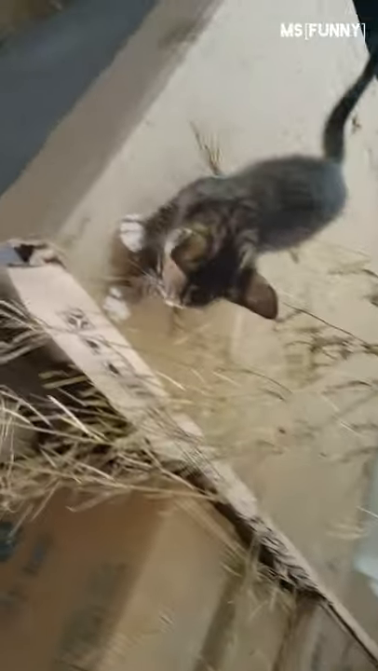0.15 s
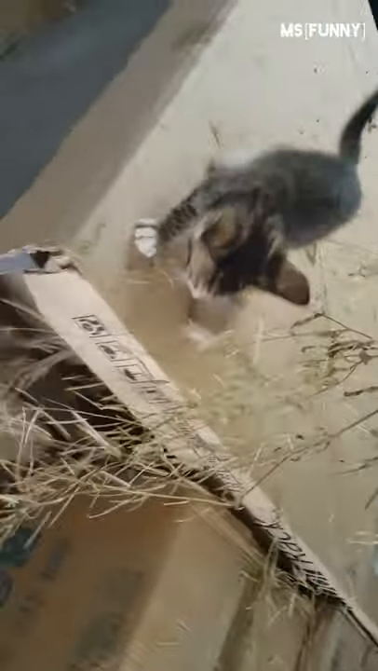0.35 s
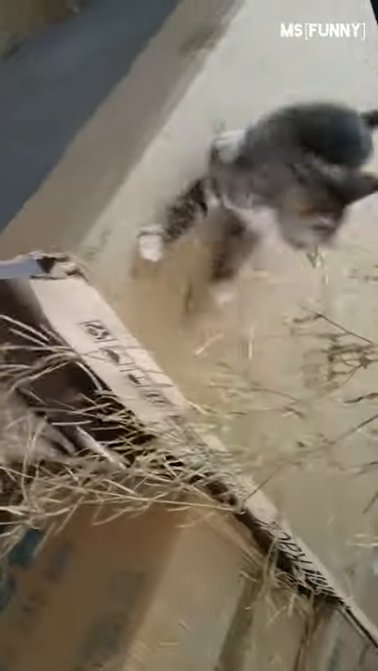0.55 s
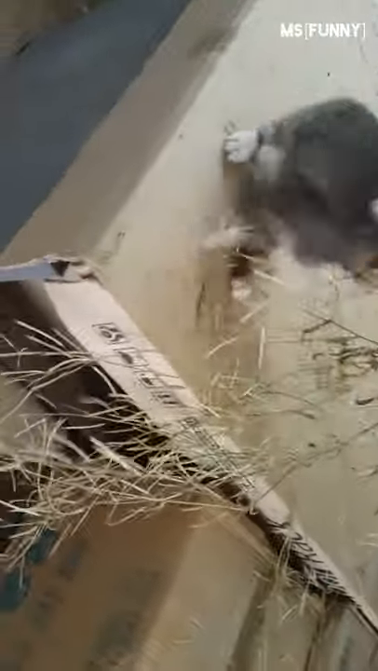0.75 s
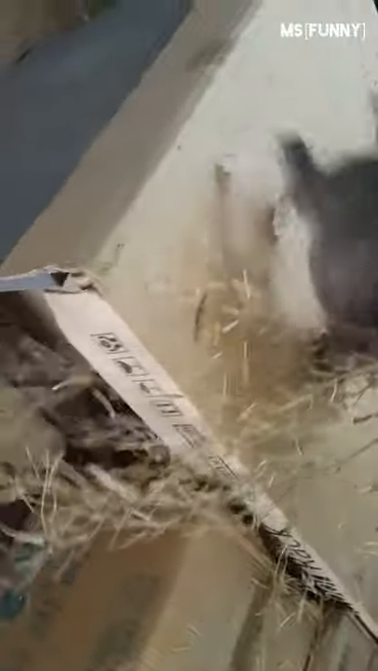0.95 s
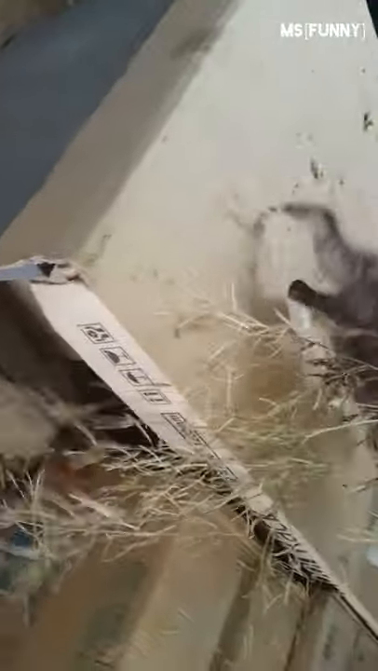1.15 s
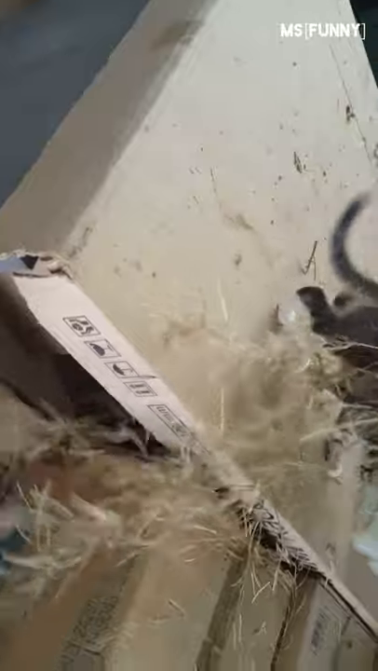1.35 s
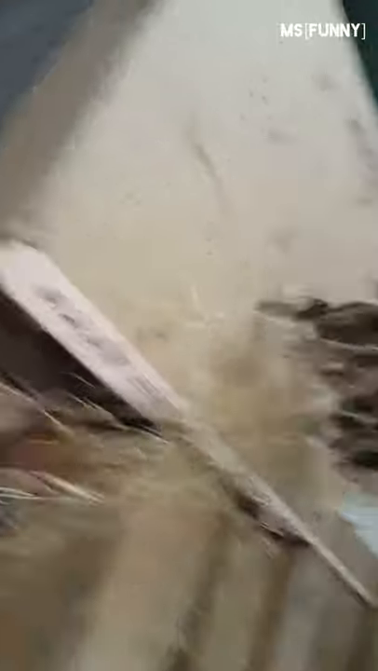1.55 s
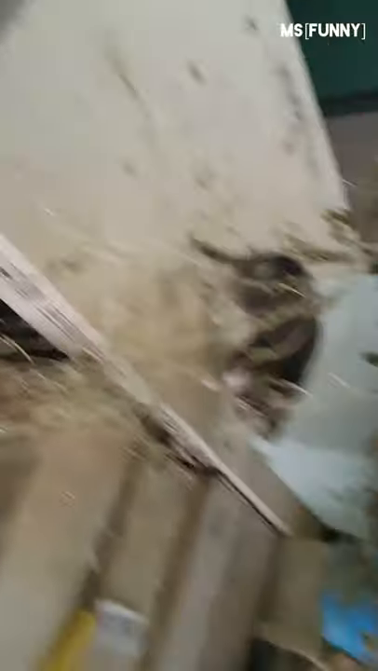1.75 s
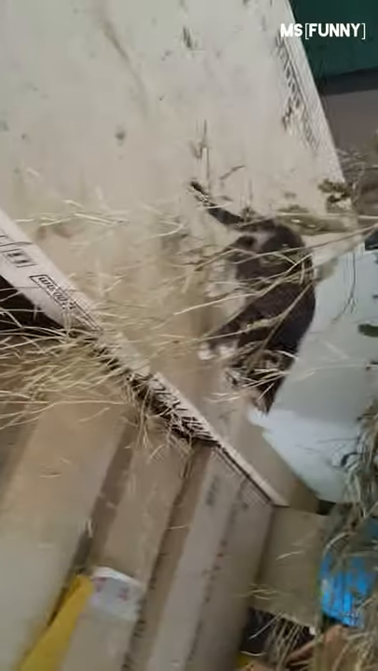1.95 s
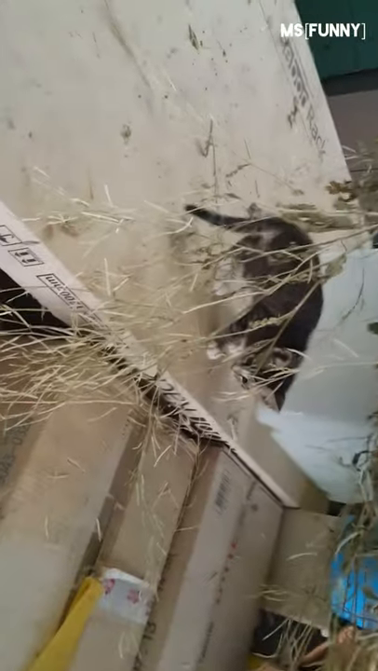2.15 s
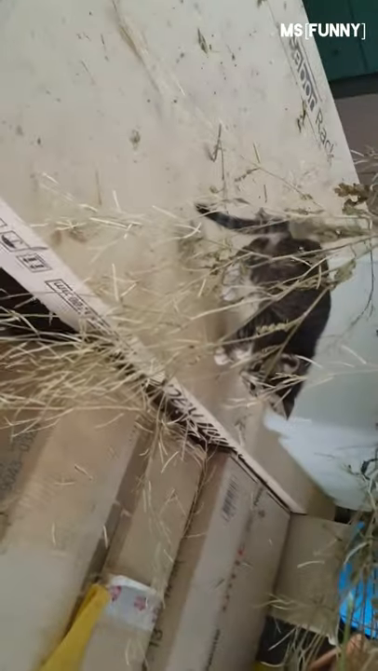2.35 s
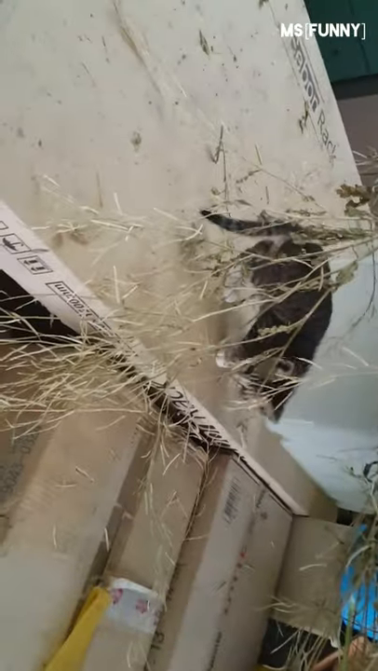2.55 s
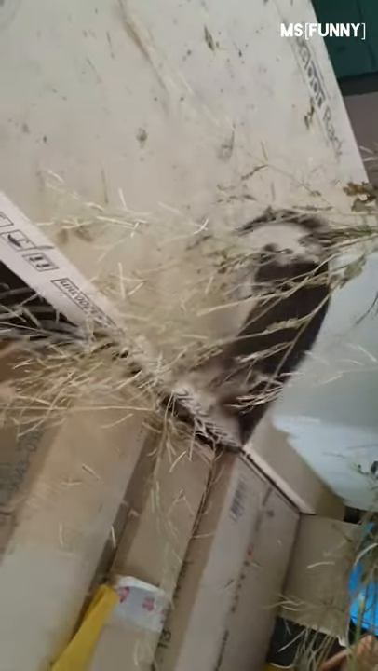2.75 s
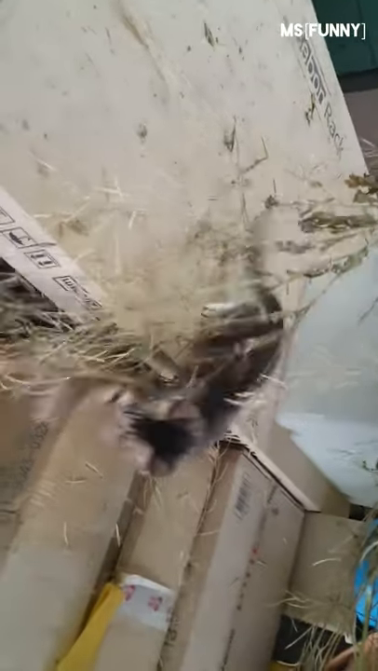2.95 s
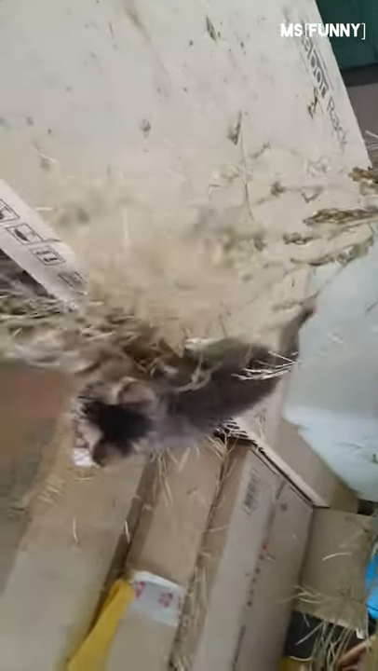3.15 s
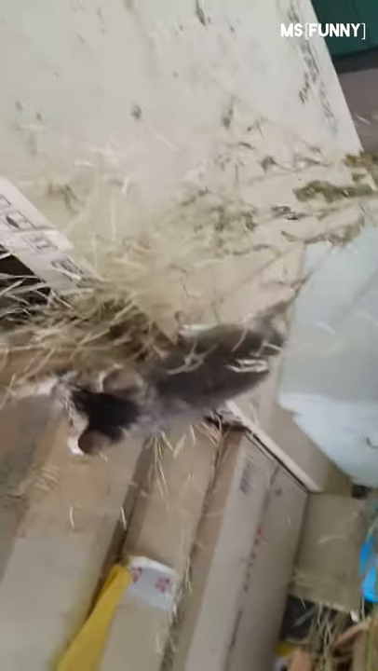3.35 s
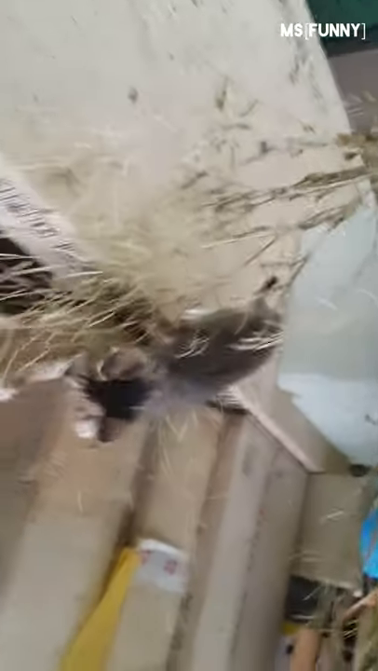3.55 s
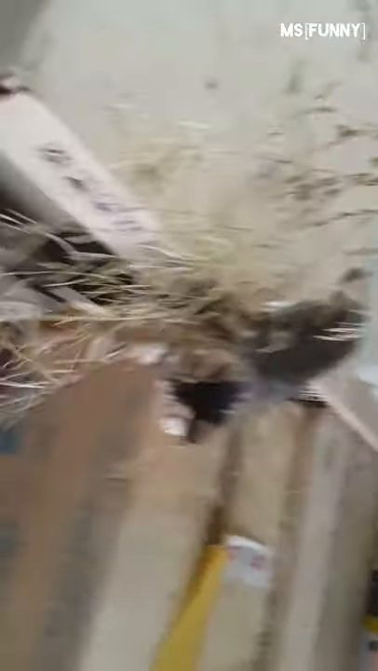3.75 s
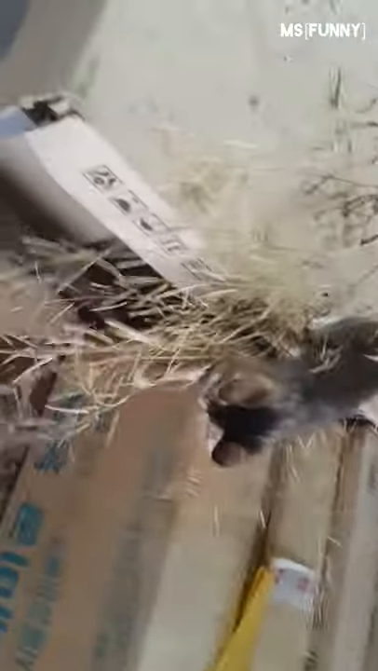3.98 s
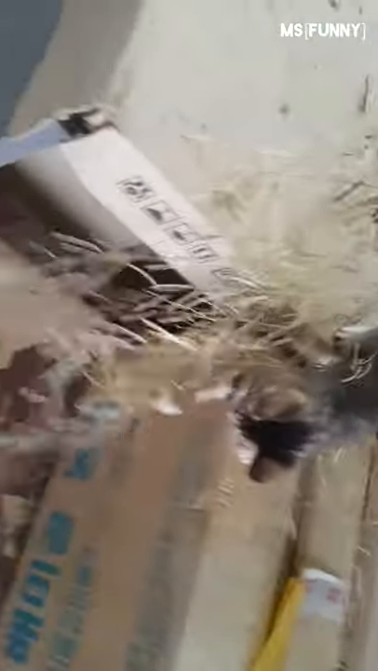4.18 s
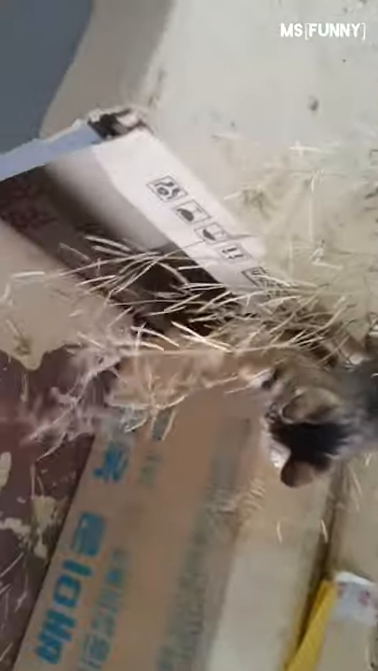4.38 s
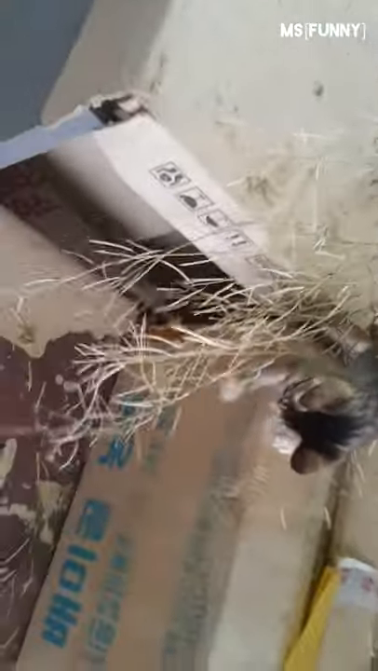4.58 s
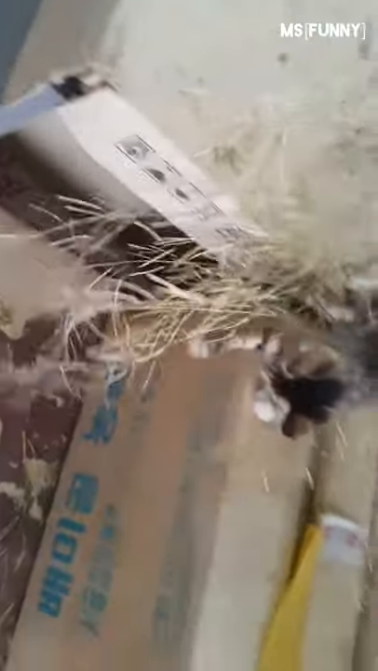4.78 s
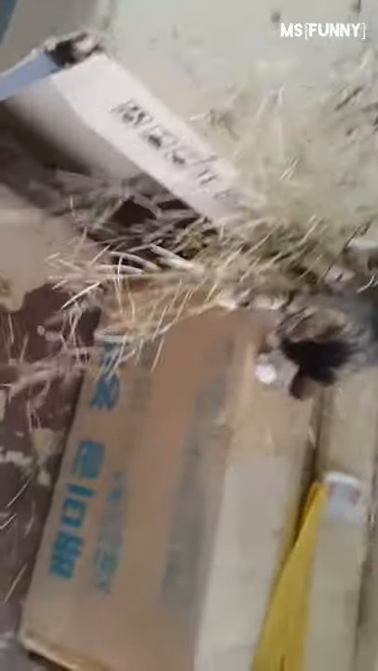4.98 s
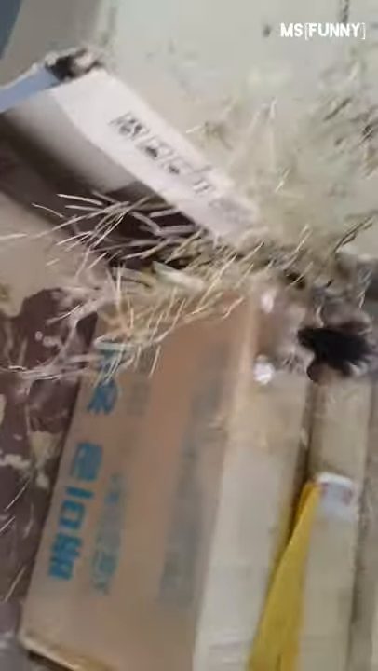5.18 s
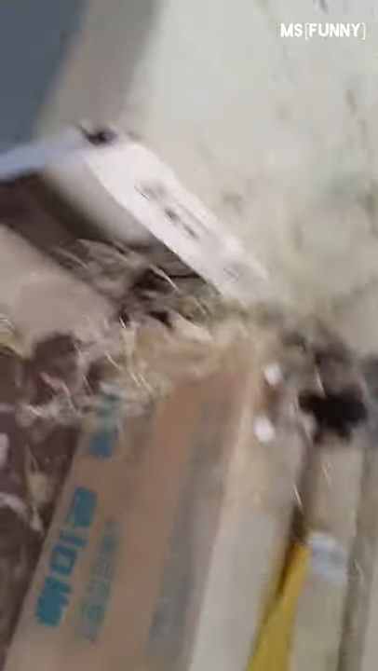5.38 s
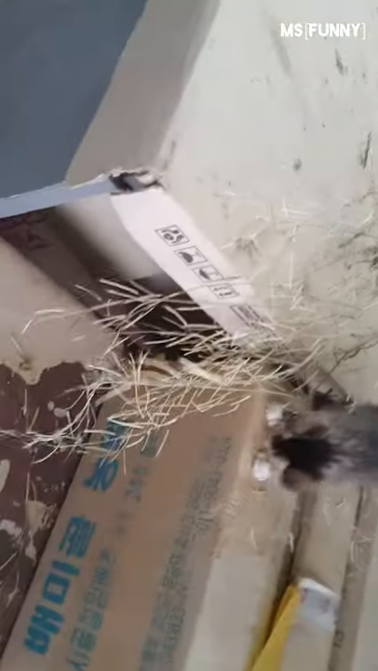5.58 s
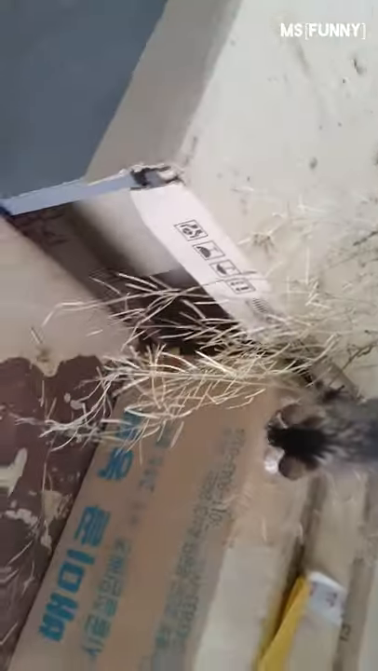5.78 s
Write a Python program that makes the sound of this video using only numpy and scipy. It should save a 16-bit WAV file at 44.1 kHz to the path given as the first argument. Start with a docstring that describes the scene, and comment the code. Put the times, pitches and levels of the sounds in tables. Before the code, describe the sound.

Dry straw crackles and small claws scrape cardboard in uneven bursts, a hollow box thumps, and a far bird chirps faintly.

```python
"""Kittens scramble over cardboard boxes and through dry straw in a quiet shed, over a steady faint hiss.
A soft swipe and a far bird open; straw crackle, claws and paws on hollow boxes build to about 1.2 s.
Quieter rustling leads to the hardest thump near 2.9 s, then scuffles come and go to the end, with a last
chirp at 4.55 s. Clicks ring small resonances for straw and card, and ring box modes for the paws; the bird
and hiss are filtered noise. Two microphone ports hear kittens on the right first on the right."""
import sys
import numpy as np
from scipy import signal
from scipy.io import wavfile

SR = 44100
rng = np.random.default_rng(int(sys.argv[2]) if len(sys.argv) > 2 else 0)


def store_wav(level_fs):
    """Save 16-bit WAV to argv[1]."""
    pcm = np.round(np.clip(np.atleast_2d(level_fs), -1, 1) * 32767)
    wavfile.write(sys.argv[1], SR, pcm.T.astype(np.int16))


N = 256662

# bursts of movement: loudest moment t/s, swell/s per 20 dB, fade/s per 20 dB (under 0.005 counts as 0.005),
# straw level/dB, claws on card level/dB, pads dragged on card level/dB
SCUFFLES = [(.27, 0.55, 0.06, -76, -67, -65.5), (0.391, 0.17, 0.02, -60.5, -61.5, -70),
            (0.458, .07, 0.15, -56, -51.5, -59), (0.571, 0.06, 0.16, -52, -65.5, -60),
            (.7, 0.12, 0.05, -56, -57.5, -79), (.77, 0.12, 0.4, -63.5, -69, -65),
            (.85, 0.2, 0.2, -61.5, -64.5, -65.5), (0.994, 0.06, 0.1934, -51, -52, -53),
            (1.06, 0.2, 0.12, -62, -58.5, -68), (1.115, 0.3, 0.16, -59.5, -66.5, -81),
            (1.225, -0.22, 0.047, -48, -65, -59.5), (1.244, -0.1, 0.0847, -51, -54.5, -64),
            (1.33, 0.24, 0.51, -64.5, -70, -70), (1.519, -0.03, 0.16, -69.5, -64, -68),
            (1.6, 0, 0.1, -77, -69, -66), (1.731, 0.03, -0.09, -56.5, -70, -62),
            (1.788, 0.16, 0.21, -69.5, -64, -59.5), (1.9, 0.33, -0.06, -84, -63.5, -75),
            (2.07, -0.42, -0.42, -63.5, -77, -75), (2.188, 0.14, 0.19, -66, -55.5, -53),
            (2.419, .05, 0.18, -67.5, -63.5, -66), (2.5, 0.4, 0.44, -72, -70, -63),
            (2.79, -0.03, 0.04, -53, -68.5, -59), (2.843, 0.0747, 0.1251, -42.5, -45.5, -48),
            (2.96, 0.11, 0.1662, -56, -52, -52), (3.082, 0.0954, 0.09, -57, -60.5, -54.5),
            (3.138, -0.0544, 0.07, -53, -54, -57), (3.2, -0.48, 0.14, -63, -67, -79),
            (3.24, 0.17, 0.37, -64.5, -71, -74), (3.53, 0.26, 0.35, -70.5, -75, -65.5),
            (3.79, 0.08, .17, -60.5, -55.5, -59.5), (3.949, 0.07, 0.2, -67, -62, -62),
            (4.302, 0.02, 0.01, -50, -51, -47), (4.329, .05, 0.075, -52, -46.5, -50),
            (4.518, 0.24, 0.19, -59, -53.5, -58), (4.799, 0.15, 0.08, -55.5, -51, -57),
            (4.9, 0.23, -0.04, -67, -60, -63), (5.091, 0.18, 0.2, -71.5, -64, -66.5),
            (5.14, 0.52, 0.45, -67, -62.5, -62), (5.278, .04, 0.7, -67, -65, -63),
            (5.48, .12, 0.45, -73.5, -66.5, -61.5), (5.77, 0.3, 0.7, -68.5, -62, -69)]
# what goes on between the bursts: straw, claws, pads (each level/dB)
SETTLING_DB = [-93.5, -77.5, -83]
# colour of straw crackle: f/Hz, relative level/dB per Hz
STRAW = [(880, -50), (1500, -6.5), (1900, -7.5), (2290, -9.5), (3610, -4), (3870, -6.5), (4800, -6),
         (5250, -3.5), (13400, -10), (15800, -16)]
# colour of claws slipping on card: f/Hz, relative level/dB per Hz
CARD = [(530, -31), (900, -3), (2120, -3.5), (2310, -4.5), (3000, -6), (3380, -8), (4000, -6.5),
        (5200, -15), (8800, -120)]
# colour of pads dragged on card: f/Hz, relative level/dB per Hz
DRAG = [(180, -36), (300, -7), (394, -6), (484, -1.5), (582, -3.5), (660, -4), (1100, -9), (1430, -16),
        (2420, -120)]
# where the moving kitten is: t/s, share of the sound from the right (0-1)
PLACE = [(0, 0), (.9, 0), (1.4, 0), (1.6, 1), (2.6, 1), (2.75, 0), (3.4, 0), (3.55, 0.97), (5.0, 0.99),
         (5.07, 0.04), (5.4, 0), (5.5, 1), (5.82, 0.99)]
# how alike left and right are: f/Hz, likeness (0-1)
LIKENESS = [(100, 0.82), (400, 0.82), (1000, 0.11), (3000, 0.074), (12000, 0.05)]
# sudden swipes through the stalks: t/s, level/dB, band centre f/Hz, left minus right level/dB,
# dying time t60/s, share in the band (0-1), sharpness of the band (more = narrower), opening snap level/dB
SWIPES = [(0.0209, -53.5, 4290, -1.5, 0.24, 0.2, 2.8, -18), (0.249, -54, 3660, -10.5, 0.12, 0.8, 2.1, -17),
          (0.3755, -36.5, 3700, -2.0, 0.15, 0.45, 2.1, -18), (0.414, -49, 4110, -1.0, 0.12, 0.65, 2.8, -18),
          (0.4417, -35, 3750, -5, 0.18, 0.9, 2.8, -20), (0.454, -33.5, 4440, 4, 0.11, 0.8, 3.9, -18),
          (0.4659, -28, 3540, -1.5, 0.12, 1, 4.3, -15), (0.5555, -40.5, 4300, -6, 0.14, 0.5, 3.2, -18),
          (0.6819, -35.5, 3380, -1.5, 0.16, 0.45, 2.5, -12), (0.9586, -36, 6100, -2, 0.34, 0.5, 2, -22),
          (1.1072, -39, 6500, 2, 0.1, 0.65, 2.8, -18), (1.2065, -34.5, 6400, -1, 0.19, 0.35, 2.2, -22),
          (1.5886, -47, 1077, 1.5, 0.21, 1, 6.8, -16), (1.7273, -49.5, 3340, -0.5, 0.087, 0.4, 3.1, -18),
          (1.7656, -46.5, 1900, -3.0, 0.25, 0.9, 3.3, -21), (1.8937, -46.5, 2400, -1, 0.18, 1, 6.3, -21.5),
          (2.0591, -46, 1180, 2, 0.18, 0.4, 4.1, -18), (2.136, -49, 2060, -1, 0.091, 0.65, 3.3, -22),
          (2.1759, -42.5, 1260, -3.0, 0.14, 0.4, 2.8, -18), (2.4888, -53, 2430, -3.0, 0.11, 0.8, 2.8, -18),
          (2.7509, -49.5, 1430, -1.5, 0.18, 0.3, 3.7, -19), (2.771, -43, 1860, 0, 0.18, 0.2, 3.2, -17.5),
          (2.818, -32, 4390, 10, 0.12, 0.2, 2.8, -18), (2.857, -31.5, 1910, -1.5, 0.16, 0.8, 2.8, -14),
          (2.948, -32, 2600, -1, 0.081, 1, 1.8, -16), (3.0188, -38.5, 2000, -1.0, 0.1, 0.8, 2.2, -20),
          (3.074, -33.5, 1350, -1.5, 0.1, 0.9, 4.9, -14), (3.136, -40, 2100, 1, 0.17, 0.5, 2.4, -18.5),
          (3.7602, -60, 2450, -5, 0.12, 0.7, 2.8, -18), (3.77, -43, 2460, -9, 0.35, 0.8, 2.2, -21),
          (3.9329, -53, 1140, -2.0, 0.15, 0.8, 2.8, -14), (4.2874, -41, 2300, -8, 0.11, 0.5, 2.5, -18),
          (4.49, -43.5, 2200, -6, 0.2, 1, 3, -18), (4.721, -40.5, 1400, -1.5, 0.12, 1, 8.2, -18),
          (4.7616, -44, 1570, -4.5, 0.086, 0.8, 3.4, -17), (4.776, -42, 2160, -3.0, 0.14, 0.5, 2.1, -18),
          (4.894, -47, 1680, -2.5, 0.19, 1, 4.3, -18), (5.0734, -45, 2580, -2.0, 0.074, 0.65, 2.8, -17.5),
          (5.079, -37.5, 1180, -4, 0.14, 0.9, 3.2, -18), (5.2551, -39.5, 2400, 1, 0.091, 1, 2.4, -18),
          (5.2713, -45, 3100, 1, 0.099, 0.3, 2.8, -16), (5.2793, -46, 2500, -2, 0.09, 0.1, 2.3, -19.5),
          (5.439, -56.5, 2640, -6, 0.13, 0.8, 3, -16), (5.4669, -45.5, 1630, -6, 0.12, 1, 3.1, -18)]
# paws on the boxes: t/s, level/dB, centre of the ring f/Hz, boom of the big wall level/dB,
# knock of the flap level/dB
THUMPS = [(0.239, -54, 340, -34, 1), (0.421, -50.5, 215, -26, 3), (0.453, -51.5, 317, -2, -8),
          (0.489, -47, 116, -12, -11), (0.659, -47, 137, 1.5, -24), (0.688, -46, 116, -7, -15),
          (0.992, -29, 131, -20, -12.5), (1.013, -30.5, 117, -15, -19), (1.027, -42, 116, -17, -17),
          (1.07, -39.5, 115, -18.5, -26), (1.199, -56, 137, -7, -4), (1.295, -51, 288, -19, -6.5),
          (1.528, -46.5, 126, -10.5, -23), (1.735, -49.5, 127, -10, -9), (1.797, -52, 116, -4, -1),
          (2.056, -54.5, 205, -30.5, -9), (2.17, -45.5, 450, -29, -7), (2.779, -45.5, 283, -6, -11),
          (2.836, -34.5, 266, -18, -10), (2.855, -12.5, 245, -40, -22.5), (2.882, -29.5, 221, -26, -31),
          (2.903, -40, 288, -11, -12), (2.942, -28, 117, -8.5, -14.5), (2.959, -23.5, 113, -5.5, -28),
          (2.983, -26, 305, -4.5, -32), (3.028, -32.5, 216, -4, -30), (3.071, -22.5, 258, -10, -18),
          (3.077, -26, 294, -18, -8.5), (3.118, -41, 116, -10, -15), (3.147, -36, 230, -14, -15),
          (3.264, -37.5, 130, -17, -27), (3.298, -49.5, 115, -15, -23), (3.758, -48, 445, -22, -11),
          (3.938, -34, 312, -26, -19.5), (3.959, -43.5, 213, -20, -21), (4.718, -54, 189, -15, -2),
          (4.893, -50, 253, -21, -11), (5.081, -32.5, 115, -34, -7), (5.086, -29, 222, -27, -22),
          (5.101, -34, 279, -34, -14), (5.149, -58, 116, -11, -19), (5.255, -42, 416, -15, -11)]
# ways the hollow box rings, a list each for big wall, small wall, air, lid, flap:
# f/Hz, level/dB, dying time t60/s
BOX_MODES = [
    [(64, -3, 0.13), (84.5, 0.5, 0.63)],
    [(118.2, 2, 0.11), (137, 0.5, 0.15)],
    [(175, -8, 0.12), (222.4, 1.5, 0.13), (259.7, 3.5, 0.068)],
    [(307.4, 1.5, 0.11), (412, -14.5, 0.14)],
    [(553, 1.5, 0.051), (695, 6, 0.06), (818, 2, 0.064), (1190, 6, 0.0067)],
]
# colour of the grumbling box walls: f/Hz, relative level/dB per Hz
SHUFFLE = [(15, -67), (25, -12), (66, 1.5), (129, -4), (162, -0.5), (271, -7.5), (404, -9.5), (500, -19.5),
           (650, -55), (1100, -120)]
# far bird, a thin note then a rough lower one: t/s, thin note f/Hz, thin level/dB, rough level/dB
CHIRPS = [(.09, 4880, -65, -61.5), (1.33, 4930, -82, -67), (2.18, 5000, -63, -67),
          (4.55, 5120, -61.5, -64.5)]
# steps of the rough note, going down: delay t/s, f/Hz
ROUGH_STEPS = [(.015, 3870), (.045, 3450)]
# colour of the steady hiss: f/Hz, relative level/dB
HUSH = [(12, -30), (20, 6.5), (30, 1.5), (49, -8), (197, -19), (375, -24.5), (525, -16), (1430, -22),
        (2310, -24.5), (4510, -31.5), (10100, -31.5), (12700, -42), (15800, -26)]

ROUNDING = 1.07   # 1 = pointed bursts, more = rounded tops
RUSTLE_PAN_DB = -1.5   # left minus right
PORT_LAG = 18   # samples by which sound from the right reaches the left port late
CRACKLE_DB, SNAP_S = -12, 0.0016   # crackle against the swipe level; time for the snap to fall to 1/e
RING_FALL_DB_PER_OCTAVE, STRIKE_DB = 9.5, -6.5   # modes far from the centre are hardly struck
# walls at rest; level under a thump, and its dying time
SHUFFLE_REST_DB, SHUFFLE_UNDER_DB, SHUFFLE_T60_S = -69.5, -23, 0.48
SHED_T60_S, WALL_CUT_HZ = 0.25, 6700
CHIRP_RISE_S, CHIRP_T60_S = 0.01, 0.8
THIN_WIDTH_HZ, ROUGH_WIDTH_HZ = 260, 500
HUSH_DB = -67.5
CUTOFF_HZ = 16150


def rustle():
    """Dry stalks crackle and snap, claws slip and pads drag: each is clicks ringing small resonances."""
    straw_db, claws_db, pads_db = bursts()
    straw_gain = from_db(straw_db + 3.0 + 1.04 * drift(25))
    straw = straw_gain * ringing(grains(30000, spread_db=0.0), STRAW, cycles=23.0, patchy_db=3.5, count=40)
    snaps = ringing(grains(370, spread_db=2.5), STRAW, cycles=6.4, patchy_db=-3.0, count=8)
    snaps = from_db(straw_db - 13.5) * snaps
    claws = ringing(grains(6000, spread_db=2.0), CARD, cycles=42.0, patchy_db=3.5, count=24)
    claws = from_db(claws_db) * claws
    pads = ringing(grains(2500, spread_db=2.5), DRAG, cycles=23.7, patchy_db=3.5, count=14)
    pads = from_db(pads_db) * pads
    return placed(straw + snaps + claws + pads, RUSTLE_PAN_DB)


def bursts():
    """Levels in dB of straw, claws and pads: each burst swells and fades, and their powers add."""
    t = np.arange(0, N, 32) / SR
    power = from_db(SETTLING_DB)[:, None] ** 2
    for s, swell, fade, *level_db in SCUFFLES:
        before, after = (s - t) / max(swell, .005), (t - s) / max(fade, .005)
        fall_db = 20 * np.where(t < s, before, after) ** ROUNDING
        power = power + from_db(np.subtract.outer(level_db, fall_db)) ** 2
    return [np.interp(np.arange(N) / SR, t, 10 * np.log10(p)) for p in power]


def swipes():
    """A swept bunch of stalks snaps, then its crackle dies away, part broad, part gathered in a band."""
    t = np.arange(9000) / SR
    out = np.zeros((2, N + len(t)))   # spare room for the last tail
    high_pass = signal.butter(2, 1300, "high", fs=SR, output="sos")
    crackle = signal.sosfilt(high_pass, grains(16000, spread_db=4.0))
    snap = np.exp(-t / SNAP_S)
    for s, level_db, hz, pan_db, t60, share, sharp, snap_db in SWIPES:
        i = round(s * SR)
        fade = from_db(CRACKLE_DB - 60 * t / t60) + from_db(snap_db) * snap
        shared, own = crackle[:, i:i + len(t)]
        burst = 0.66 * shared + .5 * own * [[1], [-1]]
        edge = 1 + .5 / sharp
        band_pass = signal.butter(1, [hz / edge, hz * edge], "band", fs=SR, output="sos")
        band = rms_one(signal.sosfilt(band_pass, burst))
        burst = np.sqrt(1 - share) * burst + np.sqrt(share) * band
        side_db = level_db + np.array([[.5], [-.5]]) * pan_db
        out[:, i:i + len(t)] += from_db(side_db) * fade * burst
    return placed(out[:, :N], 0)


def thumps():
    """A soft paw strikes every mode of the box; neighbours start in opposite sense, so the thud swells."""
    s, peak_db, centre_hz, boom_db, knock_db = np.transpose(THUMPS)
    at, out, sense = np.round(s * SR).astype(int), np.zeros(N), 1
    for group, modes in enumerate(BOX_MODES):
        scatter_db = rng.standard_normal((len(s), len(modes)))
        for k, (hz, level_db, t60) in enumerate(modes):
            body_db = -RING_FALL_DB_PER_OCTAVE * np.abs(np.log2(hz / centre_hz))
            share_db = (boom_db, body_db, body_db, body_db, knock_db)[group]
            clicks = np.zeros(N)
            clicks[at] = from_db(peak_db + share_db + level_db + STRIKE_DB + scatter_db[:, k])
            out += sense * ring(clicks, hz, t60)
            sense = -sense
    pad = np.exp(-2 * np.pi * 900 / SR)   # the pad spreads the blow over a fraction of a millisecond
    return signal.lfilter([1 - pad], [1, -pad], out)


def wall_shuffle():
    """The box walls grumble faintly as coloured clicks, louder for a while after each thump."""
    s, peak_db = np.transpose(THUMPS)[:2]
    kicks = np.zeros(N)
    kicks[np.round(s * SR).astype(int)] = from_db(peak_db + SHUFFLE_UNDER_DB) ** 2
    keep = from_db(-60 / (SHUFFLE_T60_S * SR)) ** 2   # power left after each sample
    after_thumps = signal.lfilter([1], [1, -keep], kicks + 1e-18)
    level = np.sqrt(from_db(SHUFFLE_REST_DB) ** 2 + after_thumps)
    return level * coloured(grains(900, spread_db=-0.5), SHUFFLE, patchy_db=4.5)


def shed(x):
    """Shed echoes: six feedback delays a side, weaker and duller on every round."""
    out, dull = np.zeros((2, N)), np.exp(-2 * np.pi * WALL_CUT_HZ / SR)
    lags = (rng.uniform(0.004, 0.05, 12) * SR).astype(int)
    for k, lag in enumerate(lags):
        loop, state = x.copy(), [0.]
        gain = from_db(-60 * lag / SR / SHED_T60_S)
        for i in range(lag, N, lag):
            back, state = signal.lfilter([gain * (1 - dull)], [1, -dull], loop[i - lag:i], zi=state)
            loop[i:i + lag] += back[:N - i]
        out[k % 2] += (loop - x) * (-1) ** (k // 2)   # echoes only, in alternating sense
    return out


def bird():
    """Each note arrives blurred by echoes: noise in a narrow resonance that swells and trails off."""
    out, t = np.zeros((2, N)), np.arange(SR // 2) / SR
    swell = (1 - np.exp(-(t / CHIRP_RISE_S) ** 2)) * from_db(-60 * t / CHIRP_T60_S)
    for s, thin_hz, thin_db, rough_db in CHIRPS:
        notes = [(s, thin_hz, THIN_WIDTH_HZ, thin_db)]
        notes += [(s + late, hz, ROUGH_WIDTH_HZ, rough_db) for late, hz in ROUGH_STEPS]
        for start, hz, width_hz, level_db in notes:
            t60, i = np.log(1000) / (np.pi * width_hz), round(start * SR)
            noise = rng.standard_normal((2, len(t)))
            tone = ring(ring(noise, hz, t60), hz, t60)
            out[:, i:i + len(t)] += from_db(level_db) * swell * rms_one(tone)
    return out


def hush():
    """The faint steady hiss: noise coloured band by band, a little stronger on the right."""
    hiss = coloured(rng.standard_normal((2, N)), HUSH, patchy_db=1.3)
    return from_db(HUSH_DB) * hiss * from_db([[-.9], [.9]])


def placed(x, pan_db):
    """Sound from ahead reaches both ports together, sound from the right reaches the left one late."""
    s, share = np.transpose(PLACE)
    right = np.interp(np.arange(N) / SR, s, share)
    left = np.sqrt(1 - right) * x[0] + np.sqrt(right) * np.roll(x[0], PORT_LAG)
    return np.array([left * from_db(pan_db / 2), x[1] * from_db(-pan_db / 2)])


def ringing(pair, spectrum, cycles, patchy_db, count):
    """Each click is dealt to one of many small resonances, which ring and come and go; rms 1."""
    out, dealt = 0, rng.integers(0, count, N)
    patches = [from_db(patchy_db * drift(12)) for _ in range(7)]
    for k, hz in enumerate(np.geomspace(spectrum[1][0], spectrum[-1][0], count)):
        mid, side = ring(pair * (dealt == k) * patches[k % 7], hz, cycles / hz)
        gain = from_db(at_hz(spectrum, hz)) * hz   # short high rings carry less energy
        out = out + gain * left_right(mid, side, hz)
    return rms_one(out)


def coloured(pair, spectrum, patchy_db):
    """Half-octave bands, each with its own level, flicker and left-right likeness; rms 1."""
    out, edges = 0, 20 * 2 ** np.arange(0, 10.1, .5)
    for k, (low, high) in enumerate(zip(edges, edges[1:])):
        hz = np.sqrt(low * high)
        if spectrum[0][0] / 1.5 < hz < spectrum[-1][0] * 1.5:
            band_pass = signal.butter(2, [low, high], "band", fs=SR, output="sos")
            mid, side = (-1) ** k * signal.sosfilt(band_pass, pair)
            gain = from_db(at_hz(spectrum, hz) + patchy_db * drift(10.0))
            out = out + gain * left_right(mid, side, hz)
    return rms_one(out)


def left_right(mid, side, hz):
    """A shared signal plus an opposed one; the more alike the sides, the more is shared."""
    alike = at_hz(LIKENESS, hz)
    return np.sqrt(1 + alike) * mid + np.sqrt(1 - alike) * side * [[1], [-1]]


def grains(per_s, spread_db):
    """Two unrelated trains of random clicks of uneven size, rms 1."""
    sizes = from_db(spread_db * np.minimum(rng.exponential(1, (2, N)), 5))
    sizes = sizes * rng.choice([-1, 1], (2, N))
    return rms_one(sizes * (rng.random((2, N)) < per_s / SR))


def ring(clicks, hz, t60):
    """A unit click sets a sine ringing from height 1, which falls 60 dB in t60 seconds."""
    r, w = from_db(-60 / (t60 * SR)), 2 * np.pi * hz / SR
    return signal.lfilter([0, np.sin(w)], [1, -2 * r * np.cos(w), r * r], clicks + 1e-18)


def drift(rate):
    """Slow random wander of spread 1: smoothed noise, made at every 40th sample and joined up."""
    r = np.exp(-80 * np.pi * rate / SR)
    noise = rng.standard_normal(N // 40 + 2002)
    slow = signal.lfilter([1], [1, -2 * r, r * r], noise)[2000:]   # skip the start-up
    return np.interp(np.arange(N) / 40, np.arange(len(slow)), rms_one(slow))


def at_hz(points, hz):
    """A frequency table read on a log axis."""
    table_hz, value = np.transpose(points)
    return np.interp(np.log(hz), np.log(table_hz), value)


def from_db(db):
    """Gain of a level."""
    return 10 ** (np.asarray(db) / 20)


def rms_one(x):
    """Scaled to unit rms."""
    return x / np.sqrt(np.mean(x ** 2) + 1e-20)


def scene():
    """Rustle, swipes and thumps, echoes of the last two, grumbling walls, the bird and the hush."""
    box, ticks = thumps(), swipes()
    echoes = from_db(-31.0) * shed(box + ticks.mean(axis=0))
    box_pair = box * from_db([[-1.1], [1.1]])   # a little to the right
    return rustle() + ticks + box_pair + wall_shuffle() + echoes + bird() + hush()


def record(dry):
    """The small microphone drops the deepest bass; the top is cut steeply."""
    thin = signal.sosfilt(signal.butter(2, 55, "high", fs=SR, output="sos"), dry)
    return signal.sosfilt(signal.cheby2(16, 60, CUTOFF_HZ, fs=SR, output="sos"), thin)


dry = scene()
out = record(dry)
store_wav(out)
```